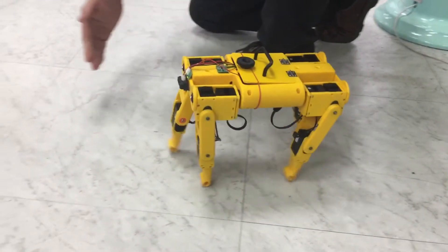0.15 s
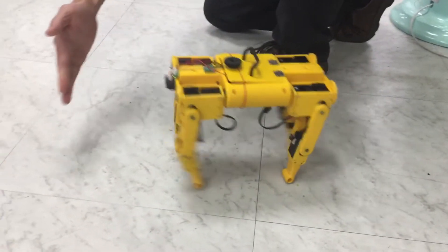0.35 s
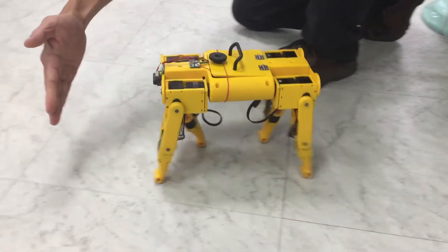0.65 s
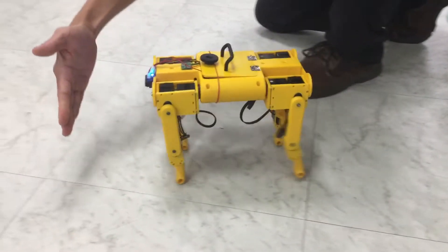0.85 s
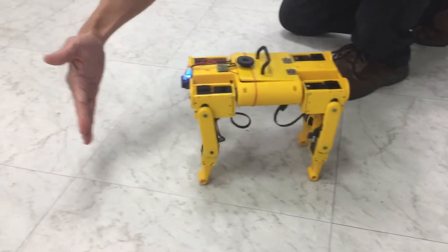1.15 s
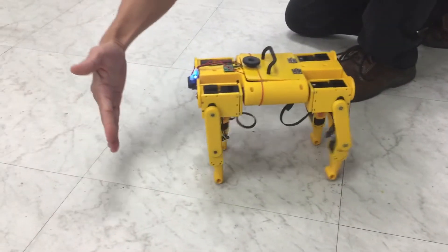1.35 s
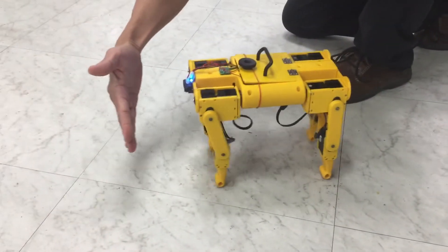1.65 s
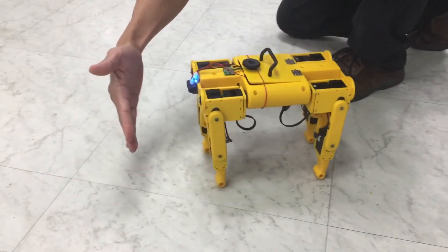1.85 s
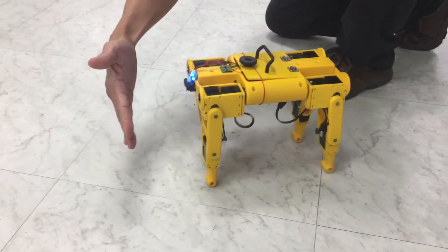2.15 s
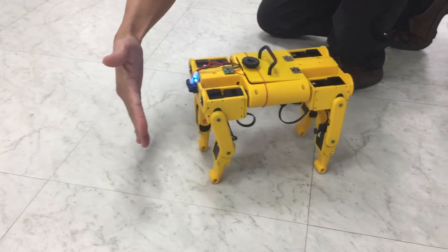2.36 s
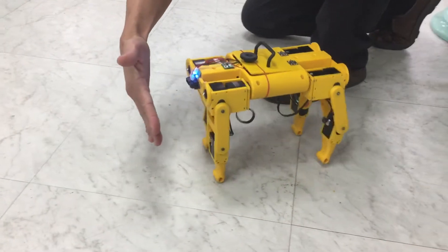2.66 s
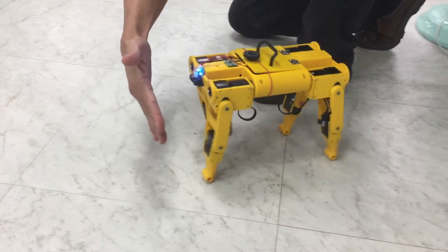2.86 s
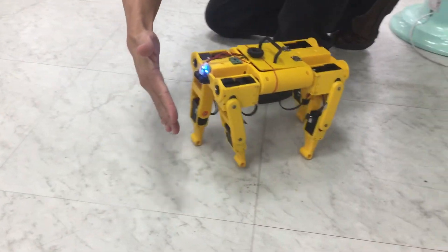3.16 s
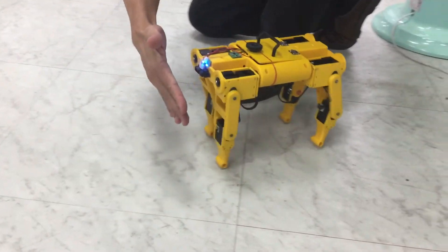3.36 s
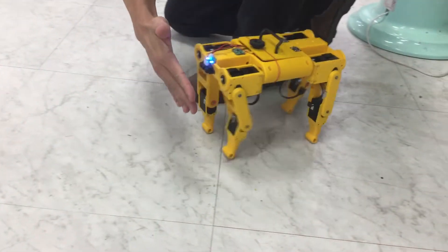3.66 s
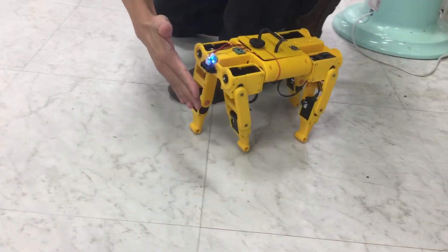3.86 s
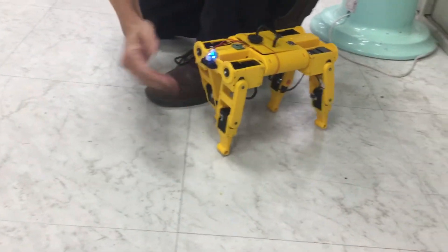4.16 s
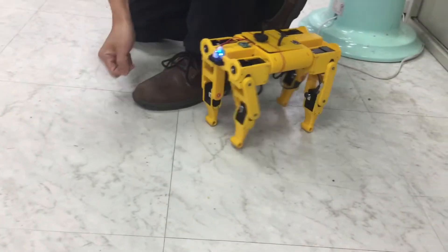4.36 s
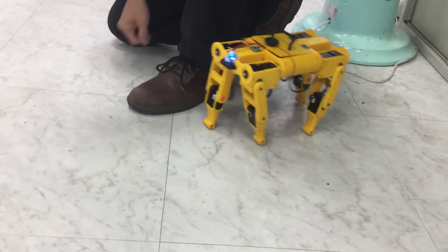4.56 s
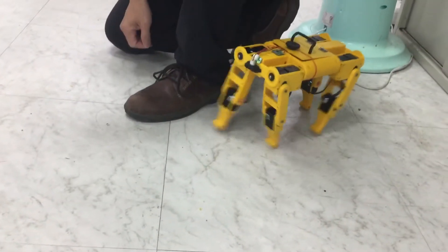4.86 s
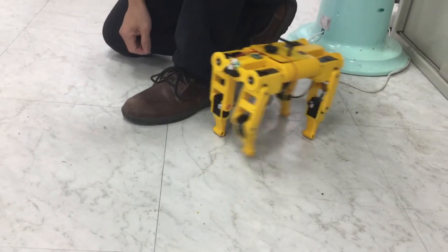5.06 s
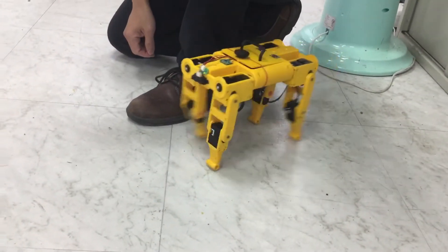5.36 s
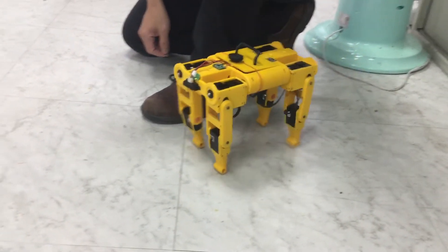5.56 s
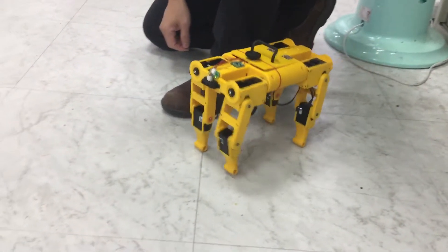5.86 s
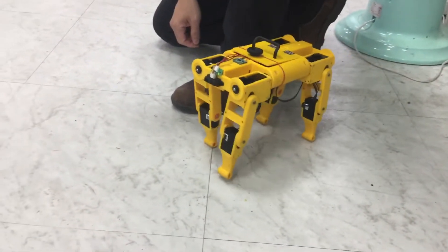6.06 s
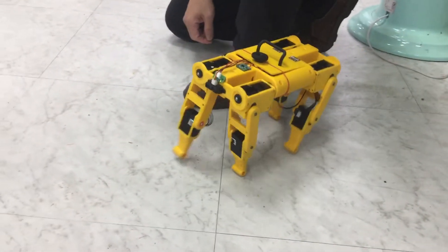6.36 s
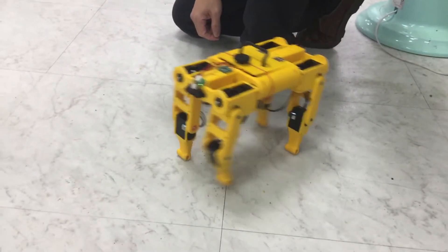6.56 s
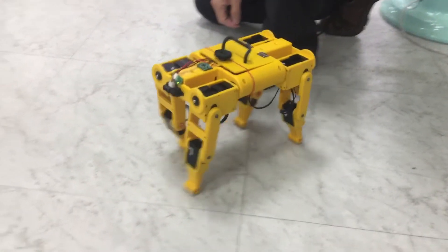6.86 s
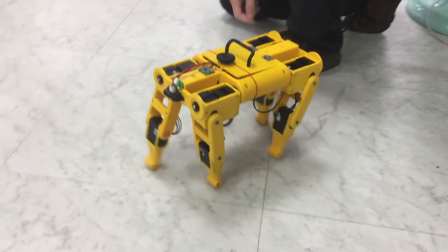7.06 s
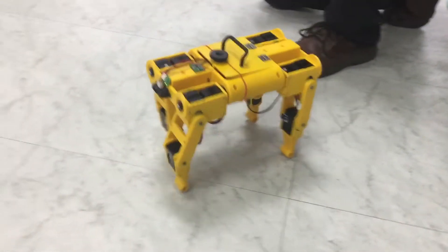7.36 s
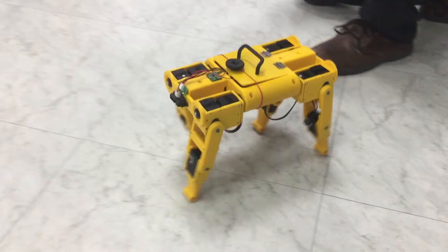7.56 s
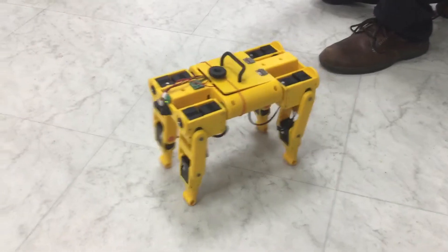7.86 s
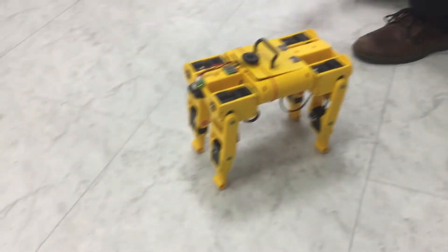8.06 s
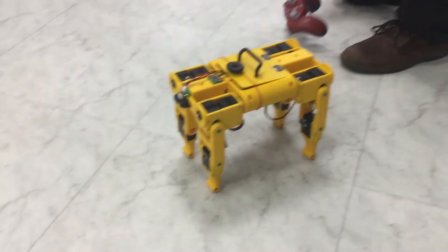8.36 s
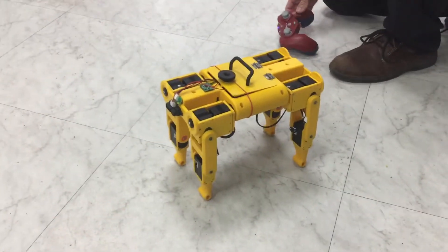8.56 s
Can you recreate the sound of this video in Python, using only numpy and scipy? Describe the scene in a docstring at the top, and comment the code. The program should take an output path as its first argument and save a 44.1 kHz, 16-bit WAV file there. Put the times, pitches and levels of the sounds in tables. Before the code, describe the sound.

Close indoor sound of toy-sized servo legs: bright gear rasp, short broken squeals, grinding under load and dry plastic knocks on hard floor. Early clacks give way to quieter shuffling with thin falling zips, then firm regular steps grow louder and busier. Short diffuse echoes follow. A piercing steady motor whistle fluctuates above soft air noise and uneven handling rumble, fading as the robot halts.

```python
"""First come soft ventilation noise over a low rumble, a very high whistle and the rasp of gears: a small
plastic robot dog is walking on a tile floor in a live room, and it stops near the end. Its feet and loose
joints clack, made of noise cracks and ringing shell modes. Its geared servos chirp, squeal, zip and whir with
bending tones, and rasp with coloured noise and ticks. The motor drivers whistle on one pitch; decaying noise
echoes the robot."""
import sys
import numpy as np
from scipy import signal
from scipy.fft import rfft, irfft
from scipy.io import wavfile
from scipy.ndimage import uniform_filter1d

SR = 44100
rng = np.random.default_rng(int(sys.argv[2]) if len(sys.argv) > 2 else 0)


def inscribe(sig):
    """Save sig as 16-bit PCM at rate SR to the path in sys.argv[1].

    A 1-D sig is mono; a 2-D sig holds one channel per row.
    Samples are clipped to [-1, 1] before scaling.
    """
    pcm = np.round(np.clip(np.atleast_2d(sig).T, -1, 1) * 32767)
    wavfile.write(sys.argv[1], SR, pcm.astype(np.int16))


N = 383669
T = np.arange(N) / SR


def undb(db):
    """Turn decibels into gain."""
    return 10 ** (np.asarray(db) / 20)


def unit(x):
    """Scale a sound to rms 1."""
    return x / np.sqrt(np.mean(x ** 2))


def add(track, start_s, sound):
    """Mix a sound into a track; one that would start before 0 starts at 0."""
    i = max(int(start_s * SR), 0)
    track[i:i + len(sound)] += sound[:N - i]


def band(x, lo_hz, hi_hz, order=2):
    """Keep mainly the pitches between two limits."""
    hi_hz = min(hi_hz, SR / 2 - 100)
    return signal.sosfilt(signal.butter(order, [lo_hz, hi_hz], "band", fs=SR, output="sos"), x)


def colour(x, points):
    """Give a sound a smooth spectrum that falls away beyond the end points; rms 1."""
    hz, db = np.transpose(points)
    f = np.arange(1, N // 2 + 2) * SR / N
    skirt = np.minimum(f / hz[0], 1) ** 2 * np.minimum(hz[-1] / f, 1) ** 2
    gain = undb(np.interp(np.log(f), np.log(hz), db)) * skirt
    return unit(irfft(rfft(x) * gain, N))


def walk(rate):
    """A smooth random curve with spread 1 that heads for a new value rate times a second."""
    knots = rng.standard_normal(int(rate * N / SR) + 3)
    smooth = uniform_filter1d(np.repeat(knots, 4), 4)
    return unit(np.interp(T * rate * 4, np.arange(len(smooth)), smooth))


def ticks(rate, spread_db):
    """Random tiny impacts of uneven size, about rate of them a second; rms 1."""
    struck = rng.random(N) < rate / SR
    size = rng.standard_normal(N)
    extra = undb(spread_db * np.minimum(rng.exponential(size=N), 4))
    return unit(struck * size * extra)


def bump(middle_s, half_s):
    """A smooth swell of height 1."""
    return np.exp(-np.minimum(((T - middle_s) / half_s) ** 2, 50))


# colour of the air noise: pitch_hz, level_db (relative)
AIR_COLOUR = [(150, 2), (220, 4), (300, 5.5), (450, -5), (1000, -6.5), (2500, -19.5), (7000, -25.5),
              (15000, -24)]
AIR_DB = -64
# low rumble, with swells where the microphone is handled; before trims and random swells:
# time_s, sub_bass_db, bass_db
RUMBLE = [(0.0, -69, -59.5), (1.28, -68, -64.5), (1.33, -59, -57.5), (1.87, -70, -67), (2.06, -56, -59.5),
          (3.15, -71, -64.5), (3.25, -56, -59), (4.19, -75, -60), (4.26, -60.5, -58.5), (5.79, -65, -64),
          (8.6, -66, -63.5), (8.7, -84, -65)]


def ventilation(sub_db=0, bass_db=-1, sub_swell_db=2, bass_swell_db=3.0):
    """Soft air noise of the building over an uneven rumble in two narrow bands of noise."""
    times, subs, basses = np.transpose(RUMBLE)
    sub_level = np.interp(T, times, subs) + sub_db + sub_swell_db * walk(6)
    sub = undb(sub_level) * unit(band(rng.standard_normal(N), 45, 69.5))
    bass_level = np.interp(T, times, basses) + bass_db + bass_swell_db * walk(12)
    bass = undb(bass_level) * unit(band(rng.standard_normal(N), 99.5, 181.0))
    air = undb(AIR_DB + 1.0 * walk(7.8)) * colour(rng.standard_normal(N), AIR_COLOUR)
    return sub + bass + air


DRIVE_HZ = 15628
# average whistle level while walking and at rest (dB); when it starts to settle to rest (s)
DRIVE_DB, IDLE_DB, REST_S = -41.5, -53, 7.73
# the whistle swells where a motor holds against its load: middle_s, half_length_s, level_db (before hold_db)
HOLDS = [(0.056, 0.032, -35), (0.413, 0.03, -34), (0.573, .035, -35), (0.935, .045, -36),
         (1.242, 0.03, -36), (2.308, 0.015, -36), (2.446, .025, -35), (2.644, 0.018, -37),
         (2.95, 0.027, -35), (3.63, 0.033, -36), (4.18, 0.013, -37), (4.503, .025, -35), (5.42, .02, -35),
         (7.1, 0.017, -35), (7.48, 0.031, -31), (7.684, 0.03, -33.5), (8.248, 0.032, -37)]


def drivers(hold_db=2, waver_db=4.0, dip_db=-9, dip_at_s=0.024, dip_s=0.019, settle_s=0.52, fringe_db=-14):
    """Motor drivers switch at one high pitch; it dips as strokes start, frayed throughout by random sidebands."""
    fringe = undb(fringe_db) * (walk(260) + 1j * walk(260))
    line = np.exp(1j * 1.3 * walk(36)) * undb(1.5 * walk(70)) + fringe
    whistle = unit(np.real(line * np.exp(2j * np.pi * DRIVE_HZ * T)))
    steady_db = np.interp(T, [REST_S, REST_S + settle_s], [DRIVE_DB, IDLE_DB]) + waver_db * walk(28)
    dips = sum(bump(s + dip_at_s, dip_s) for s, *_ in STROKES)
    holds = sum(undb(db + hold_db) * bump(s, half_s) for s, half_s, db in HOLDS)
    return np.hypot(undb(steady_db + dip_db * dips), holds) * whistle


# the gait, often about three strokes a second; levels are before the mix settings of each sound:
# start_s, length_s, opening_chirp_db, push_off_db, leg_travel_db
STROKES = [(-.06, 0.34, -70, -40, -57.5), (0.269, 0.53, -40, -39.5, -54), (0.628, 0.56, -51, -40, -52),
           (1.286, 0.27, -51, -48.5, -51.5), (1.596, 0.092, -70, -52, -49.5), (1.707, .18, -51, -50, -49.5),
           (1.896, 0.31, -60, -45, -51), (2.2134, 0.25, -44, -47.5, -53.5), (2.523, 0.24, -43, -43.5, -54),
           (2.836, .3, -48, -40.5, -55.5), (3.183, .29, -38, -42.5, -57),
           (3.527, 0.35, -38.5, -40.5, -56.5), (3.873, 0.3, -38.5, -42, -57),
           (4.2154, 0.31, -47, -39.5, -56.5), (4.561, .17, -54, -44.5, -48), (4.75, 0.1, -70, -41, -45),
           (4.86, 0.12, -47.5, -40.5, -48.5), (4.95, 0.27, -70, -43.5, -56.5),
           (5.274, 0.18, -43, -40, -51.5), (5.474, 0.16, -65, -61, -46.5),
           (5.7575, 0.28, -43, -40.5, -54.5), (6.092, 0.3, -50, -38.5, -56.5),
           (6.441, 0.35, -36, -39.5, -56), (6.8065, 0.31, -38, -36.5, -55.5),
           (7.168, 0.37, -39, -39.5, -52.5), (7.534, 0.36, -42, -37.5, -55), (7.73, 0.12, -65, -44, -49),
           (8.165, 0.049, -67.5, -50.5, -55)]
SPIN_UP_S, RUN_DOWN_S = 0.016, 0.042  # the motors start and stop
PUSH_S, PUSH_DECAY_S = 0.065, 0.05  # the push-off builds up, then dies away
RETURN_S, RETURN_WIDTH_S = 0.268, 0.021  # a second effort pulls the leg back
RETURN_DB = -3  # that effort, relative to the travel it adds to


def effort(free_db=0):
    """How hard the servos work: push off, carry the leg, pull it back, stop; free_db weights the travel."""
    power = np.zeros(N)
    for s, length_s, _, push_db, travel_db in STROKES:
        near = (T > s) & (T < s + length_s + .5)
        age = T[near] - s
        running = np.minimum(age / SPIN_UP_S, 1) * np.exp(-np.maximum(age - length_s, 0) / RUN_DOWN_S)
        push = np.minimum(age / PUSH_S, 1) * np.exp(-np.maximum(age - PUSH_S, 0) / PUSH_DECAY_S)
        travel = 1 + undb(RETURN_DB) * np.exp(-((age - RETURN_S) / RETURN_WIDTH_S) ** 2)
        push_power = (undb(push_db) * push) ** 2
        travel_power = (undb(travel_db + free_db) * travel) ** 2
        power[near] += running ** 2 * (push_power + travel_power)
    return np.sqrt(power)


JOLT_S = 0.031  # a blow's load on the gears dies away with this time constant


def jolts(give=0.66, typical_db=-38, rise_s=0.014, hard_share=0.18):
    """Every blow throws weight on the gears; the legs give, so loud blows add less than their share."""
    power, t = np.zeros(N), np.arange(SR // 3) / SR
    for s, level_db, hardness_db, _ in BLOWS:
        size = undb(typical_db + give * (level_db - typical_db) + hard_share * hardness_db)
        load = size * np.minimum(t / rise_s, 1) * np.exp(-t / JOLT_S)
        add(power, s, load ** 2)
    return np.sqrt(power)


def swirl():
    """Many servos share the work, so each third-octave of their noise swells by itself."""
    edges_hz = 1000 * 2 ** (np.arange(13) / 3)
    total = np.zeros(N)
    for lo_hz, hi_hz in zip(edges_hz, edges_hz[1:]):
        swell = undb(2.5 * walk(50))
        total += swell * band(rng.standard_normal(N), lo_hz, hi_hz)
    return unit(total)


def whir(whir_hz=4400, hunt=.17, glide=35000, ragged=0.202, bending=0.0398, squeal_s=.011, count=330):
    """Motors hunt around their speed: a running stream of faint, bright squeals, mostly falling."""
    when, tune, slope, size = rng.uniform(-1, 1, (count, 4)).T
    starts = (np.arange(count) + .5 + .5 * when) / count * T[-1]
    pitches = whir_hz * (1 + hunt * tune)
    glides = glide * (slope - .3)  # Hz per second
    rows = zip(starts, pitches, glides, 6 * size)
    return unit(squeals(rows, third_db=-5, length_s=squeal_s, ragged=ragged, bending=bending))


# colours of the two gear noises: pitch_hz, level_db (relative)
RASP_COLOUR = [(1100, -7), (2000, -3.5), (3100, -0.5), (4100, 3), (5200, 1), (7300, -4), (9400, 0),
               (10500, -4), (15500, -5)]
GRIND_COLOUR = [(130, 7), (350, -13.5), (530, 6), (900, 3), (1350, 5.5), (1800, -5), (2600, -10),
                (4000, -26)]


def gears(rasp_db=-1.0, grind_db=-8.5, whir_db=-5, tooth_db=-5, shake_db=-12, drag_db=-12, unloaded_db=-5,
          uneven_db=1.23, catch_db=3, chatter_db=1.5):
    """Teeth tick and rasp in the gearboxes, and grind lower when a leg carries weight."""
    uneven, weight = undb(uneven_db * walk(30)), jolts()
    drive = np.hypot(effort() * uneven, undb(shake_db) * weight) * undb(chatter_db * walk(220))
    drag = undb(drag_db + catch_db * walk(22)) * effort(free_db=unloaded_db) * uneven
    load = np.hypot(undb(grind_db) * weight, drag)
    teeth = ticks(rate=900, spread_db=2.0)
    rasp = colour(swirl() + undb(tooth_db) * teeth, RASP_COLOUR)
    grind = colour(.5 * rng.standard_normal(N) + teeth, GRIND_COLOUR)
    return drive * (undb(rasp_db) * rasp + undb(whir_db) * whir()) + load * grind


def strokes(chirp_db=-1, start_hz=9400, end_hz=4300, sweep_s=.02, mesh_db=0, last_s=0.023):
    """Each stroke opens with a rough, falling chirp as the motor takes up the load."""
    out, t = np.zeros(N), np.arange(SR // 12) / SR
    for s, _, db, *_ in STROKES:
        pace, tune = rng.uniform(-1, 1, 2)
        waver = unit(uniform_filter1d(rng.standard_normal(len(t)), SR // 300))
        fall = np.exp(-(t / (sweep_s * np.exp(0.164 * pace))) ** 2)
        pitch = (end_hz + (start_hz - end_hz) * fall) * (1 + 0.0274 * tune + 0.054 * waver)
        # the chirp sounds where it crosses the two resonances of the servo case
        upper = undb(chirp_db) * np.exp(-((pitch - 8700) / 650) ** 2)
        lower = undb(mesh_db) * np.exp(-((pitch - 4800) / 700) ** 2)
        fade = np.minimum(t / 0.0053, 1) * np.exp(-(t / last_s) ** 2)
        rough_pitch = pitch * (1 + 0.091 * rng.standard_normal(len(t)))
        tone = np.sin(2 * np.pi * np.cumsum(rough_pitch) / SR)
        add(out, s, undb(db) * (upper + lower) * fade * tone)
    return out


# soft, flat landings that set a leg wobbling: start_s, pitch_hz, level_db (before the fades)
THUDS = [(.287, 560, -38), (2.887, 496, -23.5), (4.158, 365, -35.5), (6.464, 524, -25), (6.47, 528, -28)]


def thuds(decay_s=0.0055, overtone_db=-5):
    """A leg bends in its two lowest modes and dies out within a few cycles."""
    out, t = np.zeros(N), np.arange(SR // 12) / SR
    for s, hz, db in THUDS:
        overtone = undb(overtone_db) * np.sin(2 * np.pi * 1.66 * hz * t)
        wobble = np.sin(2 * np.pi * hz * t) + overtone
        add(out, s, undb(db) * wobble * np.minimum(t / 0.0014, 1) * np.exp(-t / decay_s))
    return out


# ringing of the plastic legs and shell, before small random changes at each blow:
# pitch_hz, level_db, t60_s (time to fade by 60 dB)
SHELL = [(364, -2.5, 0.029), (544, -2, 0.058), (683, 7.5, 0.014), (840, 2, 0.0028), (1003, 6.5, 0.0053),
         (1274, 2, 0.014), (1342, 5.5, 0.012), (1565, -1, 0.027), (1894, -3.5, 0.015), (2224, 6.5, 0.0083),
         (2544, 4.5, 0.013), (3174, 3.5, 0.023), (3804, 8.5, 0.011), (4070, -11.5, 0.011),
         (4580, 13.5, 0.005), (4200, -16, .018), (5670, 1, 0.013), (10070, 1.5, 0.0064)]


def blow(t, crack_s=0.002, crack_db=11, ring_s=0.0087, ring_db=-3, modes_db=-4, scatter_db=2, play_s=.006,
         rebound=0.67, rattle_db=-6, rattle_s=0.017):
    """One hard contact: a crack and the shell's modes, struck again as slack joints rebound and rattle."""
    hz, db, t60 = np.transpose(SHELL)[:, :, None]
    detune, strength, side = rng.standard_normal((3, len(SHELL), 1))
    # the pose of the leg shifts each mode a little
    pitch = hz * (1 + .02 * detune)
    size = np.sign(side) * undb(db + scatter_db * strength)
    modes = size * np.sin(2 * np.pi * pitch * t) * np.exp(-np.log(1000) * t / t60)
    crack_fade = undb(crack_db) * np.exp(-t / crack_s) + undb(ring_db) * np.exp(-t / ring_s)
    crack = rng.standard_normal(len(t)) * crack_fade
    ring = (undb(modes_db) * modes.sum(0) + crack) * np.minimum(t / 0.00098, 1)
    sizes = rng.uniform(-1, 1, len(t))
    # rattling contacts strike at random, about 300 a second, ever more weakly
    contacts = (rng.random(len(t)) < 300 / SR) * sizes * undb(rattle_db) * np.exp(-t / rattle_s)
    contacts[0] = 1
    for when, strike in rng.random((3, 2)):
        contacts[1 + int(when * play_s * SR)] += rebound * strike
    return signal.fftconvolve(contacts, ring)[:len(t)]


# feet landing and joints hitting their stops, before the mix settings:
# start_s, level_db, hardness_db (tilt per register), hollow_db (extra hollow ring of the shell)
BLOWS = [(0.29, -42.5, -4.5, -7.5), (0.334, -32.5, 1.5, 4.5), (.51, -55, -4, 6.5), (.677, -31.5, 7, -2.5),
         (0.684, -39.5, 0.5, 0), (.729, -41.5, 3.5, -6), (.806, -54, 13.5, 6), (.864, -42.5, 3, -4),
         (1.354, -47.5, 9.5, 12.5), (1.441, -50.5, -0.5, 5.5), (1.505, -49.5, -3, 9),
         (1.528, -46.5, 8, -13), (1.744, -44.5, 4.5, 4), (1.812, -59.5, 16, 18.5), (1.965, -45.5, 9, 9),
         (2.122, -46, 4, -0.5), (2.186, -48.5, -2.5, 4), (2.23, -55.5, -5, 7), (2.378, -51, 8.5, 4),
         (2.561, -43.5, 0, -1), (2.888, -41, -6.5, 5.5), (3.091, -47, -2, 8), (3.215, -41, 2.5, 1.5),
         (3.232, -35, 6, 5), (3.43, -57, -5.5, 8), (3.45, -50, -3, 4), (3.564, -39, -0.5, 7),
         (3.762, -45, 5.5, 6.5), (3.785, -43, 7.5, -3), (3.917, -31.5, 3.5, 0.5), (4.085, -44, 1.5, 2),
         (4.11, -44, 3, 0), (4.254, -40.5, -1, 6), (4.271, -39, -2, 7), (4.427, -37.5, 3, 2),
         (4.461, -41.5, 2.5, 4.5), (4.608, -28.5, 3.5, 1.5), (4.852, -46.5, 8, 8.5),
         (4.905, -29.5, 3.5, -4), (4.926, -44.5, 6, 5), (4.94, -40, 1.5, 2), (4.971, -32.5, 6.5, 9.5),
         (5.336, -27, 3, -6.5), (5.449, -46, 4, -4), (5.534, -42, -1.5, 0), (5.631, -32.5, 3.5, 0.5),
         (5.823, -37, 2.5, -6.5), (6.049, -51, -0.5, 7.5), (6.084, -43.5, 3.5, 4), (6.118, -50, -3, -1),
         (6.145, -32.5, 3.5, -4), (6.465, -40.5, -1.5, -3), (6.504, -33.5, 3, 0.5), (6.67, -55, -4, 0),
         (6.845, -30.5, 5, -1), (6.984, -48, 9.5, 3), (7.183, -34, 3, 0), (7.216, -26.5, 4, -5.5),
         (7.41, -38, 6, -3.5), (7.548, -32, 3.5, -2), (7.579, -42, 7, -5), (7.705, -47, 7.5, 1),
         (7.849, -28, 2.5, -1.5), (8.621, -55, -4.5, 5.5)]
# registers of a blow, from the whole body to the contact point: low_hz, high_hz
REGISTERS = [(240, 900), (900, 2300), (2300, 6000), (6000, 17000)]
# one value per register: level_db of an average blow, added to its own level
REGISTER_DB = [-3.5, 0, 0, -8.5]
# one value per register: share of the hollow ring (0 to 1)
HOLLOW = [0, 1, 0.44, 0]


def feet(blow_db=-1, thump_db=-15, thump_s=0.069, scuff_db=-12):
    """A foot scuffs, then lands: flat landings knock and thump the floor, glancing ones tick and snap."""
    out, t = np.zeros(N), np.arange(SR // 10) / SR
    lead = np.arange(-SR // 100, 0) / SR  # the moments just before contact
    swell = np.exp(lead / .002)
    height = np.arange(len(REGISTERS)) - (len(REGISTERS) - 1) / 2
    for s, level_db, hardness_db, hollow_db in BLOWS:
        hit = blow(t)
        levels = level_db + np.array(REGISTER_DB) + hardness_db * height + hollow_db * np.array(HOLLOW)
        for (lo_hz, hi_hz), db in zip(REGISTERS, levels):
            part = band(hit, lo_hz, hi_hz, order=3)
            # the level is set over the first 8 ms
            add(out, s, part * undb(db + blow_db) / np.std(part[:SR // 125]))
            scuff = unit(band(rng.standard_normal(len(lead)), lo_hz, hi_hz)) * swell
            add(out, s + lead[0], undb(db + scuff_db) * scuff)
        thump = unit(band(rng.standard_normal(len(t)), 77, 316)) * np.exp(-t / thump_s)
        add(out, s, undb(levels[0] + thump_db) * thump)
    return out


def joints(click_db=-54, spread_db=3, count=24):
    """Slack joints click faintly at random while the robot walks."""
    out, t = np.zeros(N), np.arange(SR // 10) / SR
    for when, size in rng.random((count, 2)):
        click = band(blow(t), 900, 12000)
        level = undb(click_db + spread_db * (2 * size - 3))
        add(out, when * STROKES[-1][0], click * level / np.std(click[:SR // 125]))
    return out


# the loudest gear squeals: middle_s, pitch_hz, glide_hz_per_s, level_db (before the lift in scene)
SQUEALS = [(.694, 3900, 10000, -38), (.933, 4500, -60000, -43.5), (1.343, 3370, -10000, -40.5),
           (1.941, 3600, 20000, -44), (2.058, 4030, 0, -49), (2.26, 3870, 15000, -42),
           (2.582, 3410, 20000, -43.5), (2.609, 4310, -10000, -50), (2.919, 3970, -10000, -43),
           (4.984, 4240, -10000, -40), (5.363, 3890, 7, -41), (5.585, 4120, -50000, -42),
           (6.872, 3960, -60000, -41), (7.234, 3790, -20000, -41), (7.6, 4000, -10000, -41.5),
           (7.807, 4330, -60000, -56)]


def squeals(rows, third_db=-15, length_s=0.016, broken_db=3, ragged=.13, bending=.02):
    """The gear mesh sings briefly on a bending, broken pitch, with a third harmonic."""
    out, t = np.zeros(N), np.arange(-SR // 25, SR // 25) / SR
    for s, hz, glide, db in rows:
        noises = rng.standard_normal((2, len(t)))
        bend, grip = (unit(uniform_filter1d(noise, SR // 250)) for noise in noises)
        slide = glide * length_s * np.tanh(t / length_s)
        pitch = hz * (1 + bending * bend + ragged * rng.standard_normal(len(t))) + slide
        phase = 2 * np.pi * np.cumsum(pitch) / SR
        tone = np.sin(phase) + undb(third_db) * np.sin(3 * phase)
        add(out, s + t[0], undb(db + broken_db * grip) * np.exp(-(t / length_s) ** 2) * tone)
    return out


# while the robot shuffles round, one motor zips once a gait cycle: first zip (s), period (s), level (dB)
ZIP_FIRST_S, ZIP_PERIOD_S, ZIP_DB = 1.118, .306, -39.5


def zips(zip_hz=13200, fall_hz_per_s=130000, half_s=0.012, rough=0.126, count=5):
    """A lightly loaded motor brakes with a thin, rough, falling zip high in the treble."""
    out, t = np.zeros(N), np.arange(-SR // 30, SR // 30) / SR
    for s in ZIP_FIRST_S + ZIP_PERIOD_S * np.arange(count):
        roughness = unit(uniform_filter1d(rng.standard_normal(len(t)), size=6))
        pitch = (zip_hz - fall_hz_per_s * t) * (1 + rough * roughness)
        tone = np.sin(2 * np.pi * np.cumsum(pitch) / SR)
        add(out, s + t[0], undb(ZIP_DB) * np.exp(-(t / half_s) ** 2) * tone)
    return out


# how long the room's echoes last: pitch_hz, t60_s (time to fade by 60 dB)
ROOM_T60 = [(200, 0.37), (1000, 0.43), (4000, 0.49), (9000, 0.061), (15000, 0.6)]


def room(x, wet_db=-11.0, build_s=0.0021):
    """Diffuse echoes from floor and walls, each octave dying at its own pace."""
    t, tail = np.arange(SR * 2 // 3) / SR, 0
    hz, t60 = np.transpose(ROOM_T60)
    for centre in 125 * 2. ** np.arange(8):
        decay = np.exp(-np.log(1000) * t / np.interp(np.log(centre), np.log(hz), t60))
        octave = band(rng.standard_normal(len(t)), centre / np.sqrt(2), centre * np.sqrt(2))
        tail = tail + octave * decay
    tail = tail * (1 - np.exp(-t / build_s))
    return x + undb(wet_db) * signal.fftconvolve(x, tail / np.linalg.norm(tail))[:N]


def scene():
    """The robot echoes in its room; the whistle and the ventilation are added without echo."""
    servos = gears() + strokes() + undb(1.0) * squeals(SQUEALS) + zips()
    body = thuds() + feet() + joints()
    return (ventilation() + drivers() + room(servos + body))[None]


TOP_HZ = 16100


def record(dry):
    """The microphone's top is cut steeply."""
    return signal.sosfilt(signal.ellip(10, .1, 80, TOP_HZ, fs=SR, output="sos"), dry)


dry = scene()
out = record(dry)
inscribe(out)
```